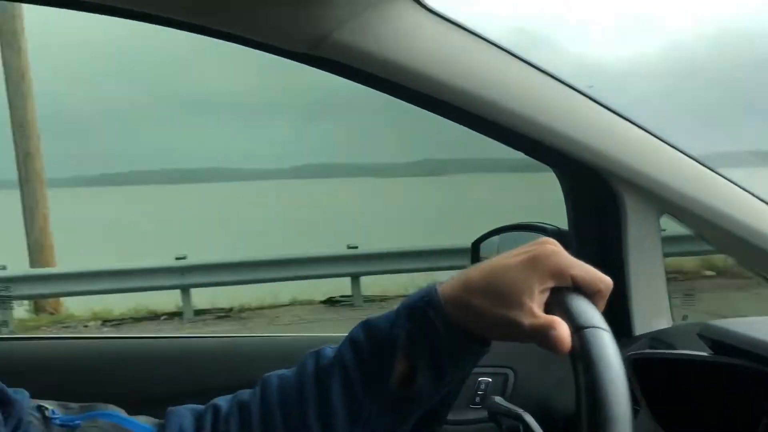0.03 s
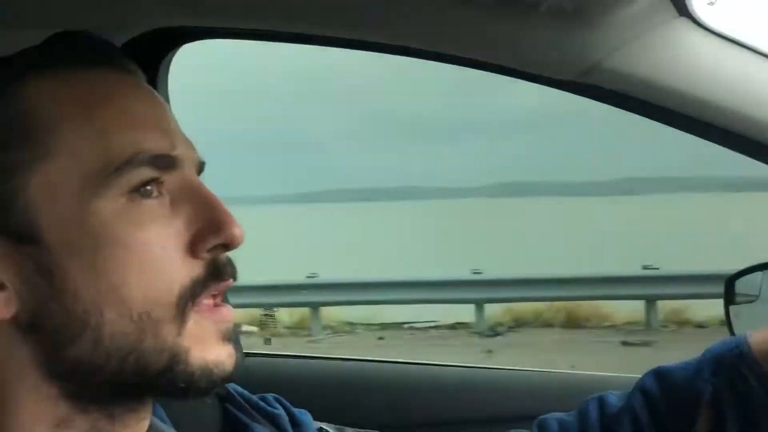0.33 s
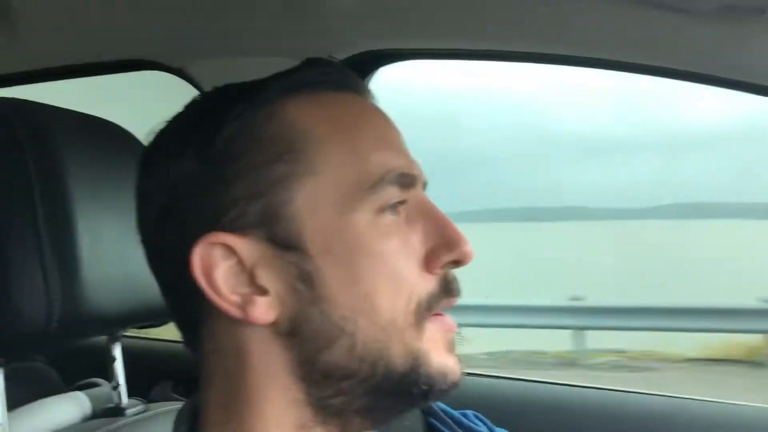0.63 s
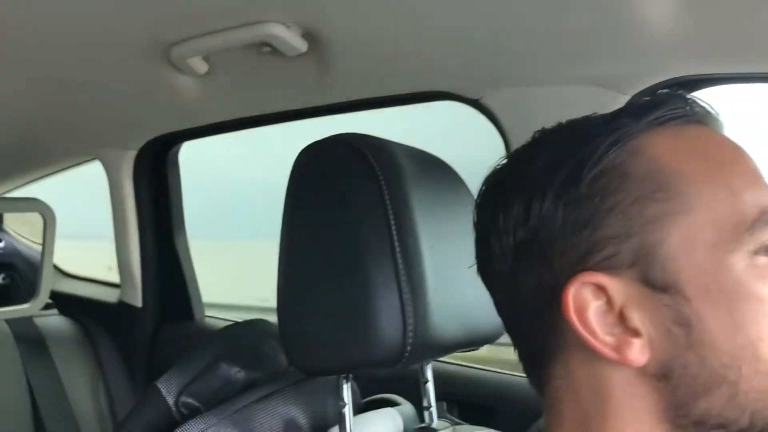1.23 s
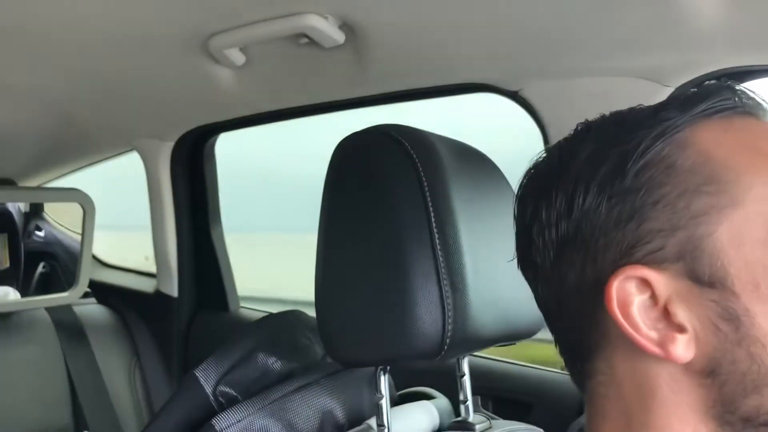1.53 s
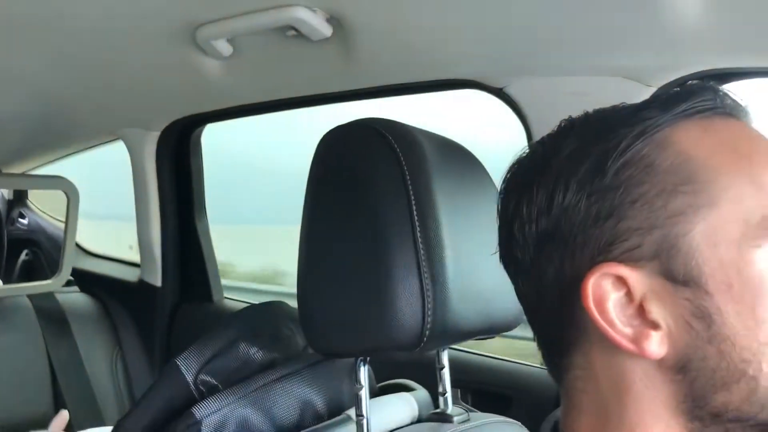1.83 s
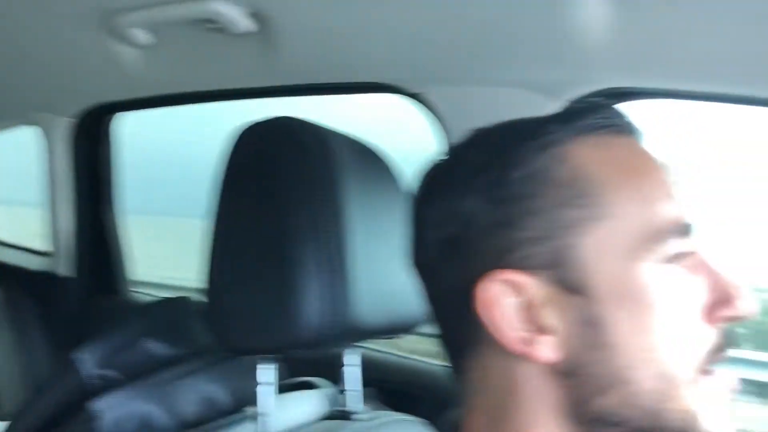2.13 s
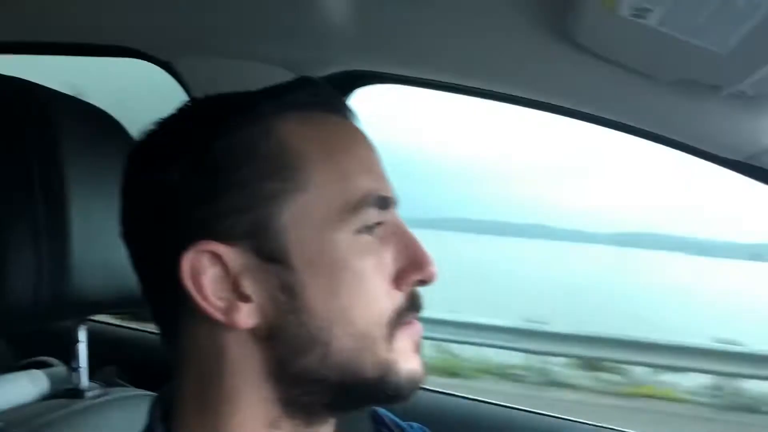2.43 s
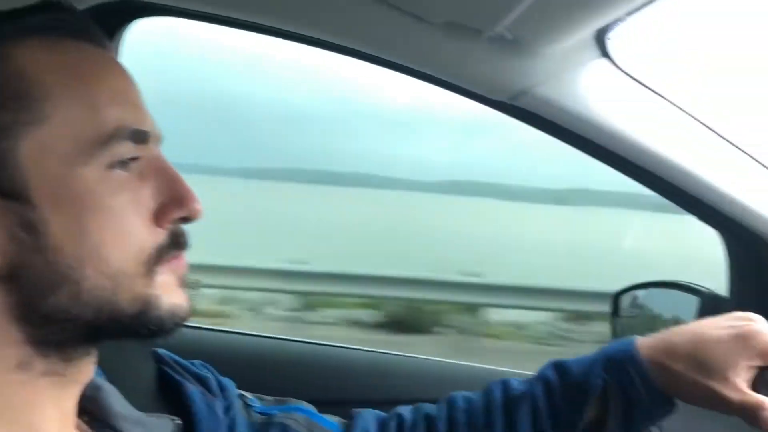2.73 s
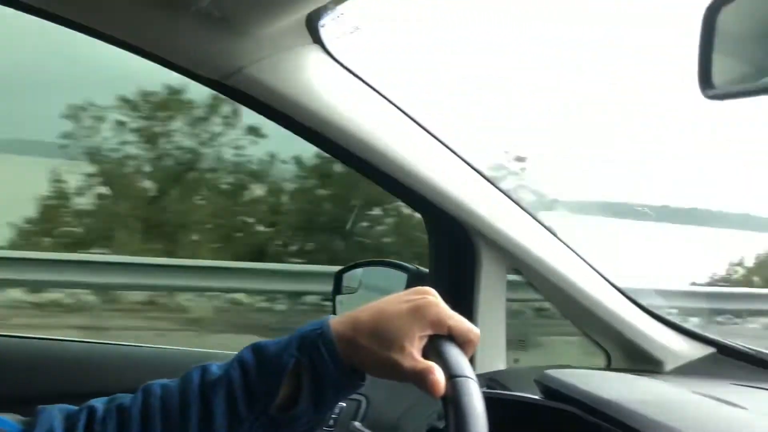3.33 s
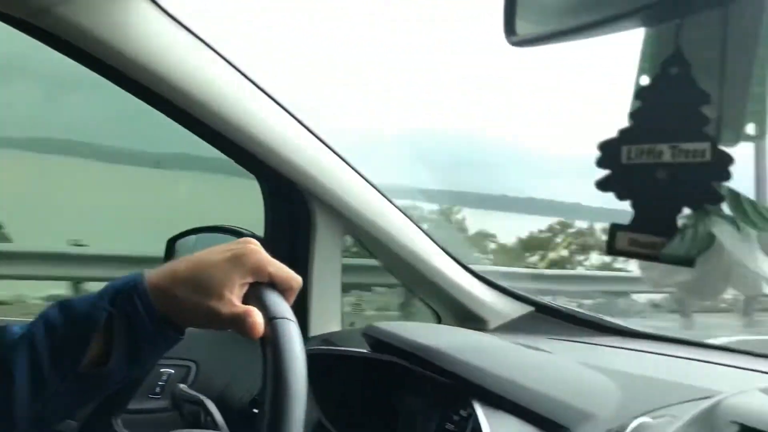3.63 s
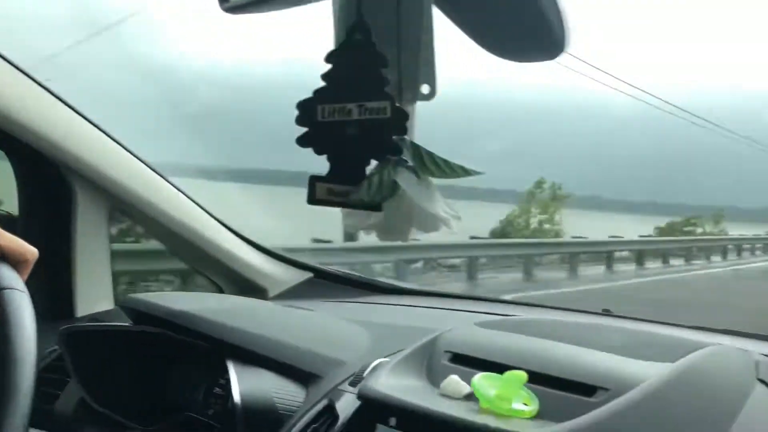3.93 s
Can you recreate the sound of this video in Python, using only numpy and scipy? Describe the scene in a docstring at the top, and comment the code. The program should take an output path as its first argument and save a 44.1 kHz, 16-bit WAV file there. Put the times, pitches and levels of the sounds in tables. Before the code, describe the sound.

A car's deep road rumble and muffled tyre roar run steadily for four seconds, heard inside the closed cabin. Soft bumps thump at the start, near 0.6 seconds, from 1.2 to 1.6, and around 3.5 and 3.8. Loose plastic ticks at about 0.5. Keys jingle lightly from 1.4 to 1.9, around 3 seconds and again near the end, over a very faint rustle.

```python
"""Inside a cruising car

With the windows closed, the road shakes the body into a deep rumble and the tyres roar. Patches in the
asphalt thump through the suspension. Small metal pieces, probably keys, collide and ring as the car
sways, and loose plastic ticks and squeaks now and then over a faint rustle."""
import sys
import numpy as np
from scipy import signal
from scipy.fft import rfft, irfft
from scipy.io import wavfile

SR = 44100
rng = np.random.default_rng(int(sys.argv[2]) if len(sys.argv) > 2 else 0)


def master(y):
    """Save y as 16-bit WAV."""
    cut = np.clip(np.atleast_2d(y).T, -1, 1)
    pcm = np.round(cut * 32767)  # scale
    wavfile.write(sys.argv[1], SR, pcm.astype(np.int16))


N = 176400
TIME = np.arange(N) / SR
BRIGHT_HZ, CUTOFF_HZ = 4300, 15650  # band of cracks and scrapes

# Spectrum of the body's rumble. Each row: frequency in Hz, relative density in dB.
RUMBLE_SPECTRUM = [(15, -30), (28, -22), (42, -7.5), (60, -14.5), (74, -0.5), (92, -5.5), (114, 0.5),
                   (132, -4.5), (168, -10), (240, -9.5), (300, -17.5), (400, -21.5), (520, -26), (800, -43),
                   (2000, -86)]
# Coarseness of the asphalt. Each row: time in seconds, change of rumble level in dB.
COARSENESS = [(0, 1), (.2, 0), (.45, -1.5), (.7, 3), (.85, 0), (1.7, 0), (2.1, 0), (2.4, -0.5), (2.8, 2),
              (3.05, 3.5), (3.2, 0), (3.5, 0.5), (3.74, 0), (3.88, -2.5), (4, -1.5)]
# Air resonances of tyres and cabin. Each row: centre in Hz, width in Hz, level in dB.
CAVITY_MODES = [(205.75, 10.3, -37), (236.2, 11.4, -40.5), (349.8, 29, -45), (429.7, 26.6, -50),
                (598, 42.5, -51), (904.4, 35.7, -51.5), (1015.6, 76, -53)]
# Spectrum of tread and air. Each row: frequency in Hz, relative density in dB.
ROAR_SPECTRUM = [(200, -30.5), (450, -6), (700, -0.5), (1000, -1), (1180, -5.5), (1600, -11.5), (2300, -19),
                 (3000, -28.5), (4500, -35.5), (7000, -43.5), (11000, -46.5), (16000, -56)]
# Course of the rustle. Each row: time in seconds, level in dB.
RUSTLE_LEVELS = [(0, -66), (.38, -66), (.6, -61), (.73, -62.5), (.9, -71), (1.35, -73), (1.45, -61),
                 (1.75, -69), (1.92, -87), (2.3, -70), (2.65, -64), (3, -62.5), (3.2, -67), (3.42, -61.5),
                 (3.65, -72), (3.86, -64), (4, -63.5)]
# Spectrum of the rustle. Each row: frequency in Hz, relative density in dB.
RUSTLE_SPECTRUM = [(1000, -4.5), (3200, 7), (5000, -1.5), (7500, -2.5), (10000, -8.5), (15500, -10)]
# A wheel meets a bump. Each row: start in seconds, thud pitch in Hz, then relative levels in dB
# of thud, boom, drumming and knock.
WHEEL_IMPACTS = [(.003, 102, -22, -34, -18.5, -35), (0.07, 84.8, -14, -25, -32, -41),
                 (0.536, 100, -13.5, -16, -19.5, -35), (0.584, 82, -20.5, -16.5, -26, -45),
                 (.648, 105, -13, -15, -14.5, -47), (1.19, 110.9, -19.5, -22.5, -23, -41.5),
                 (1.284, 109.9, -18.5, -19.5, -44, -55), (1.452, 111.5, -26, -31, -20.5, -28),
                 (1.485, 92.5, -14, -32, -37, -46), (1.553, 104, -10.5, -39, -15.5, -29),
                 (1.601, 85.2, -12.5, -23, -33, -70), (2.838, 99.8, -31, -35, -28, -57),
                 (3.022, 109, -25, -22, -27, -50), (3.374, 95, -25, -30, -31.5, -61),
                 (3.42, 92, -14, -39.5, -40, -52), (3.484, 92, -12.5, -22, -27.5, -41),
                 (3.817, 122.1, -18, -18.5, -21, -32.5), (3.887, 135.9, -18, -25, -25, -42)]
# Boom, drumming and knock of the body. Each row: low and high edge in Hz, T60 in seconds.
BODY_BANDS = [(41, 60, 0.44), (182.5, 316.5, 0.19), (413, 900, 0.086)]
# Plastic impacts. Each row: start in seconds, level in dB, low and high edge in Hz.
PLASTIC_TICKS = [(.429, -51, 5500, 9050), (.456, -37.5, 4500, 9900), (.455, -37.5, 1730, 5030),
                 (.494, -46.5, 4200, 9500), (.521, -42, 4460, 5740), (.542, -52, 6470, 9000),
                 (.586, -47, 4000, 9000), (1.425, -41, 1400, 3900), (1.656, -48, 3000, 3900),
                 (2.904, -41, 1900, 4300), (3.381, -55, 5000, 10000)]
# Keys touch. Each row: start in seconds, then relative levels in dB of the scrape and of the
# low, middle and high modes.
KEY_TOUCHES = [(0.6459, -54, -65, -64, -66), (0.7267, -48, -68, -69, -61), (0.8255, -43, -66, -63, -67),
               (1.295, -49, -74, -62.5, -74), (1.4207, -39, -62, -53, -60), (1.4466, -39, -68, -51.5, -61),
               (1.4614, -43, -64, -66, -66), (1.484, -50, -57, -59, -69), (1.5224, -48, -54.5, -55, -72),
               (1.5444, -48, -58, -55, -70), (1.5704, -53, -67, -63, -72), (1.6142, -37, -52, -52.5, -54),
               (1.6294, -50, -62, -69, -72), (1.6586, -42, -51, -52, -63), (1.6816, -39, -49, -60, -62),
               (1.7225, -48, -58, -60, -68), (1.7419, -50, -56, -57, -66), (1.7794, -49, -59, -59, -76),
               (1.8382, -51, -73, -62, -71), (1.8627, -46, -69, -64, -71), (2.0487, -53, -67, -64.5, -75),
               (2.5326, -56, -66, -65, -81), (2.6584, -57, -69, -61, -68), (2.7067, -53, -71, -58, -77),
               (2.7931, -54, -59.5, -55, -76), (2.8174, -50, -61, -55, -72), (2.8544, -43, -61, -54, -63),
               (2.8694, -48, -69, -68, -57), (2.9093, -56, -56, -58, -73), (2.9452, -42, -56, -63, -63),
               (2.957, -47, -50, -54, -58), (3.0011, -41, -54, -49, -56), (3.024, -34, -53.5, -47.5, -62),
               (3.0414, -46, -53, -52, -69), (3.0729, -45, -56, -49, -71), (3.1143, -51, -63, -58.5, -73),
               (3.1737, -51, -75, -61, -68), (3.2016, -44, -67, -57.5, -65), (3.7344, -43, -62, -56.5, -67),
               (3.7733, -51, -62, -60, -76), (3.8132, -44, -59.5, -53.5, -71),
               (3.8442, -42, -58, -55, -42.5), (3.8694, -53, -57.5, -59, -75), (3.9204, -52, -60, -57, -66),
               (3.952, -58, -64, -65, -76)]
# Modes of the keys. Each row: frequency in Hz, relative level in dB, T60 in seconds.
KEY_RESONANCES = [(3600, -12.5, 0.038), (4650, -11, .035), (4867, -1, 0.054), (5000, -10, 0.032),
                  (5540, -10, 0.073), (7090, -6, 0.038), (7440, -7, .07), (7620, -5.5, 0.027),
                  (8400, -6, .03), (8620, -11.5, .05), (10620, -4.5, .025), (10820, -5.5, 0.045),
                  (11850, -7, .02), (13400, -11, .018)]
# Trim rubs. Each row: time of the peak in seconds, level in dB, pitch in Hz.
TRIM_SQUEAKS = [(.705, -69, 3550), (2.375, -69, 3620), (2.715, -68.5, 5050)]


def from_db(db):
    """Amplitude ratio of a level in decibels."""
    return 10 ** (np.asarray(db) / 20)


def unit_rms(x):
    """Normalisation to unit power."""
    return x / np.sqrt(np.mean(x ** 2) + 1e-20)


def curve(rows):
    """Linear interpolation of (seconds, value) rows."""
    return np.interp(TIME, *np.transpose(rows))


def drift(rate_hz):
    """Random fluctuation: low-passed noise of unit power."""
    hz = np.arange(N // 2 + 1) * SR / N
    return unit_rms(irfft(rfft(rng.standard_normal(N)) / (1 + (hz / rate_hz) ** 2), N))


def coloured(spectrum):
    """Noise of unit power, spectrally shaped by (Hz, dB) rows."""
    hz, db = np.transpose(spectrum)
    bins = np.arange(N // 2 + 1) * SR / N + 1e-6
    gain = from_db(np.interp(np.log(bins), np.log(hz), db))
    return unit_rms(irfft(rfft(rng.standard_normal(N)) * gain, N))


def band_noise(low_hz, high_hz):
    """Band-limited noise of unit power."""
    band = signal.butter(2, [low_hz, high_hz], "band", fs=SR, output="sos")
    white = rng.standard_normal(N + SR)
    return unit_rms(signal.sosfilt(band, signal.sosfilt(band, white))[SR:])


def decay(start, t60, attack_s=1e-4):
    """Damped envelope: a linear rise and an exponential fall of 60 dB in t60 seconds."""
    age = TIME - start
    return np.clip(age / attack_s, 0, 1) * from_db(-60 * np.clip(age / t60, 0, 2))


def road(rumble_db=-25, flutter_db=1.62, cavity_share=.11):
    """Forced vibration: coarser asphalt drives the body harder, and the air cavities slightly so."""
    coarse_db = curve(COARSENESS)
    rumble = coloured(RUMBLE_SPECTRUM) * from_db(rumble_db + coarse_db + flutter_db * drift(6.7))
    cavity = sum(from_db(db) * band_noise(hz - width / 2, hz + width / 2)
                 for hz, width, db in CAVITY_MODES)
    return rumble + cavity * from_db(cavity_share * coarse_db)


def tyres(level_db=-43, flutter_db=1.41):
    """Transmission loss: the glass muffles the even roar of tread and air."""
    return coloured(ROAR_SPECTRUM) * from_db(level_db + flutter_db * drift(29))


def rustle(grain_db=3, patchy_db=2):
    """Friction noise: faint, grainy rubbing, as of a sleeve."""
    rubbing = coloured(RUSTLE_SPECTRUM) * from_db(grain_db * drift(280) + patchy_db * drift(25))
    return from_db(curve(RUSTLE_LEVELS)) * unit_rms(rubbing)


def bumps(thud_gain_db=2.5, knock_gain_db=2, body_gain_db=-2, knock_hz=810):
    """Impact excitation: the floor thuds, the suspension knocks, the body rings longest in the lows."""
    out = np.zeros(N)
    for start, thud_hz, thud_db, _, _, knock_db in WHEEL_IMPACTS:
        thud = np.sin(2 * np.pi * (thud_hz * TIME + rng.random()))
        knock = np.sin(2 * np.pi * knock_hz * (TIME - start))
        out += from_db(thud_gain_db + thud_db) * decay(start, t60=.28, attack_s=.0082) * thud
        out += from_db(knock_gain_db + knock_db) * decay(start, t60=.09, attack_s=2 / knock_hz) * knock
    for band, (low, high, t60) in enumerate(BODY_BANDS):
        # Crowded modes act as noise, here with its envelope partly levelled.
        analytic = signal.hilbert(band_noise(low, high))
        ringing = unit_rms(analytic.real / np.sqrt(np.abs(analytic) ** 2 + .5))
        power = sum((from_db(levels[band]) * decay(start, t60, attack_s=.9 / high)) ** 2
                    for start, _, _, *levels in WHEEL_IMPACTS)
        out += from_db(body_gain_db) * ringing * np.sqrt(power)
    return out


def plastic(crack_db=-12):
    """Heavy damping: loose plastic rings briefly in a broad band under a bright crack."""
    crack = from_db(crack_db) * band_noise(BRIGHT_HZ, CUTOFF_HZ)
    return sum(from_db(db) * decay(start, t60=.019, attack_s=.003) * (crack + band_noise(low, high))
               for start, db, low, high in PLASTIC_TICKS)


def key_ringing(gain_db=-2.5, scatter_db=3, detune=.005, chatter_s=.006, settle_s=.05, settle_db=-10):
    """Free vibration: keys of slightly different pitch collide firmly, then lightly as they settle."""
    mode_hz, mode_db, t60 = np.transpose(KEY_RESONANCES)
    group = np.digitize(mode_hz, [6400, 9600])  # low, middle or high
    age = np.arange(SR // 12) / SR
    damping = np.exp(-np.log(1000) * age / t60[:, None])
    out = np.zeros(N + SR)
    for start, _, *group_db in KEY_TOUCHES:
        touch_db = gain_db + mode_db + np.array(group_db)[group]
        firm = [(chatter_s * (k + rng.random()) / 3, 0) for k in range(3)]
        light = [(delay, settle_db * (1 + delay / settle_s)) for delay in settle_s * rng.random(15)]
        for delay, force_db in firm + light:
            pitch_draw, level_draw = rng.standard_normal((2, len(mode_hz)))
            gains = from_db(touch_db + force_db + scatter_db * level_draw)
            signs = rng.choice([-1, 1], len(gains))
            phase = 2 * np.pi * np.outer(mode_hz * (1 + detune * pitch_draw), age)
            onset = int((start + delay) * SR)
            out[onset:onset + len(age)] += (gains * signs) @ (damping * np.sin(phase))
    return out[:N]


def key_scrapes(gain_db=-8.5, grit_db=4):
    """Sliding friction: each touch of the keys gives a gritty burst; overlapping bursts add in power."""
    power = sum((from_db(db) * decay(start, t60=.02, attack_s=.0024)) ** 2
                for start, db, *_ in KEY_TOUCHES)
    grit = unit_rms(band_noise(BRIGHT_HZ, CUTOFF_HZ) * from_db(grit_db * drift(300)))
    return from_db(gain_db) * np.sqrt(power) * grit


def squeaks(swell_s=.03, spread=.06):
    """Frictional vibration: rubbing trim gives a rough, narrow band that swells and fades."""
    out = np.zeros(N)
    for peak, db, hz in TRIM_SQUEAKS:
        swell = np.exp(-((TIME - peak) / swell_s) ** 2)
        out += from_db(db) * swell * band_noise(hz * (1 - spread), hz * (1 + spread))
    return out


def cabin(direct, reflected_db=-6):
    """Reverberation: dense reflections from glass and trim die away quickly."""
    tail = rng.standard_normal(N) * decay(start=.0045, t60=.07)
    tail /= np.sqrt(np.sum(tail ** 2))
    return direct + from_db(reflected_db) * signal.fftconvolve(direct, tail)[:N]


def scene():
    """Superposition in one channel: road noise and rustle, with small rattles reflected in the cabin."""
    ride = road() + tyres() + bumps() + rustle()
    rattles = key_ringing() + key_scrapes() + plastic() + squeaks()
    return (ride + cabin(rattles))[None]


def record(dry, fade_s=.002):
    """Band limiting: a steep low-pass cuts the top after both ends are briefly faded."""
    fade = np.clip(np.minimum(TIME, TIME[-1] - TIME) / fade_s, 0, 1)
    low_pass = signal.ellip(12, .1, 80, CUTOFF_HZ, fs=SR, output="sos")
    return signal.sosfilt(low_pass, dry * fade)


dry = scene()
out = record(dry)
master(out)
```